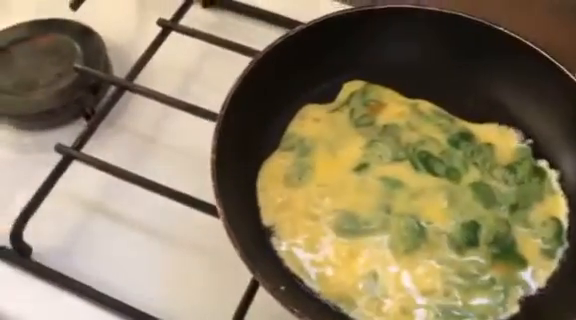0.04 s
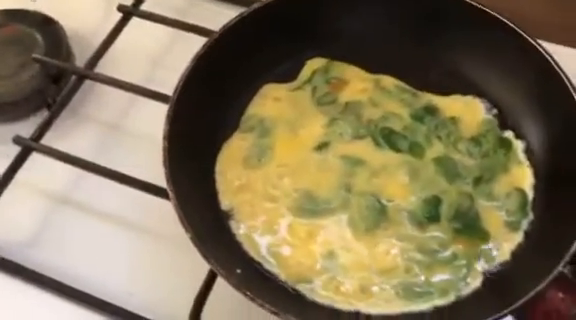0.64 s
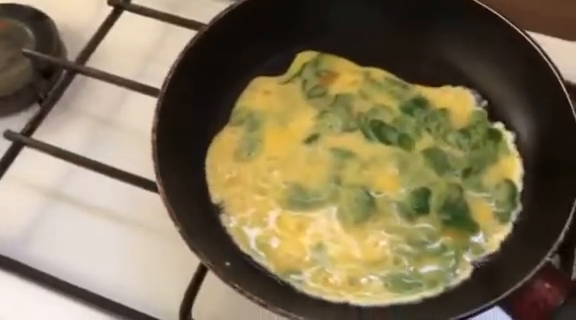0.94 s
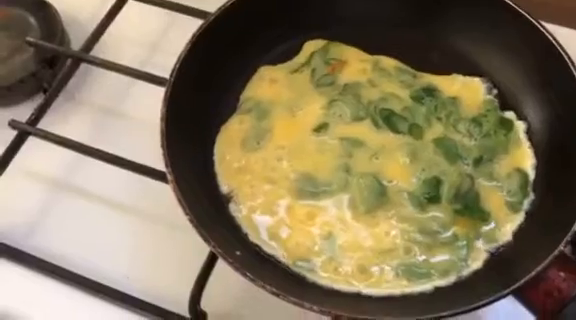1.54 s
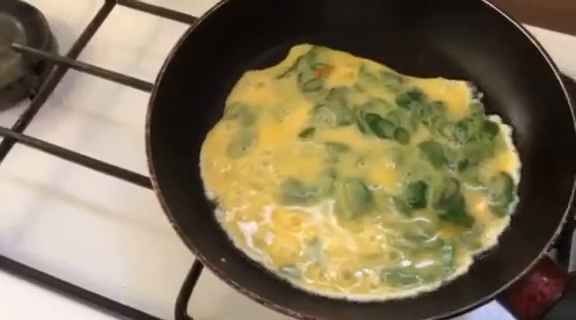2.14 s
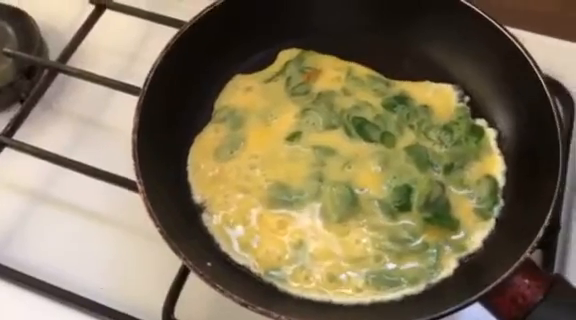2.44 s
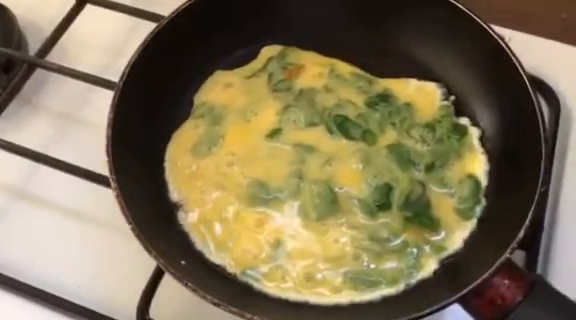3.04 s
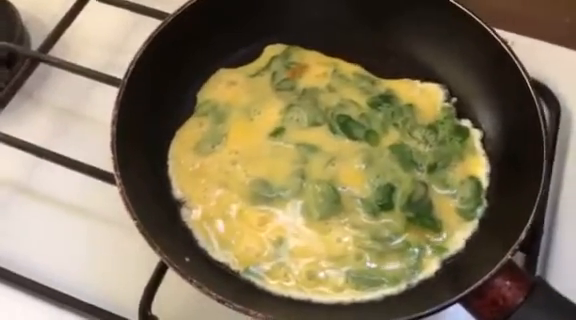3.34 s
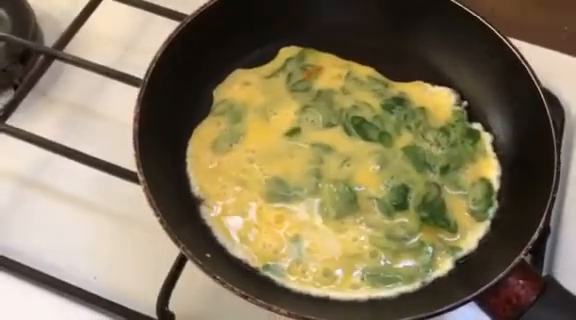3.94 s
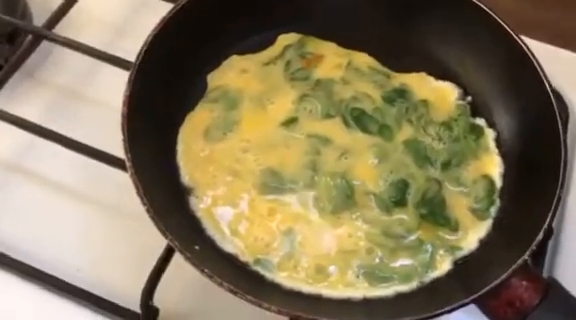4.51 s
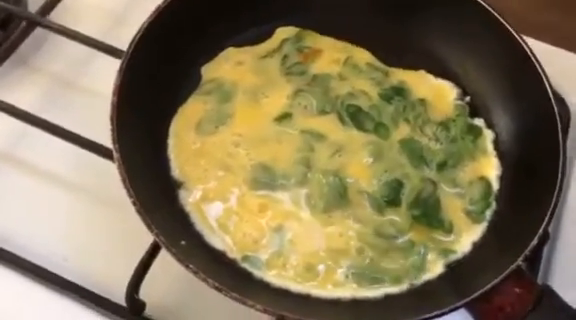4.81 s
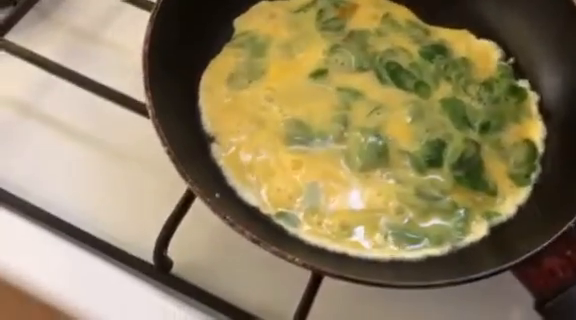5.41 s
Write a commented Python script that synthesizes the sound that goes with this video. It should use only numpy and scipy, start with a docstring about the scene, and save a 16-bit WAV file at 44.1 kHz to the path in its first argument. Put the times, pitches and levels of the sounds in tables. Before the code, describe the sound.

An omelette fries gently on a gas stove, with a faint fizz, small spits of fat and soft bubbling plops. Early on, the pan knocks on the metal grate with a quick rattle, then knocks again, ringing briefly. Later a steel utensil clinks twice and something is set down with a soft, dull thud. A low hum and the burner's rush continue underneath, heard from close by in a small kitchen.

```python
"""An omelette fries gently in a pan on a gas stove in a small kitchen: tiny bubbles fizz in the fat,
droplets spit, and steam plops through the egg in short rising notes. The pan knocks twice on the grate
and rattles, ringing the bars and booming the stove top. Later a steel utensil clinks twice and
something is set down with a dull thud. A low hum and the rush of the burner lie under it all."""
import sys
import numpy as np
from scipy import signal
from scipy.fft import rfft, irfft
from scipy.io import wavfile
from scipy.ndimage import uniform_filter1d

SR = 44100
rng = np.random.default_rng(int(sys.argv[2]) if len(sys.argv) > 2 else 0)


def transcribe(signal):
    """Save signal, clipped to [-1, 1], as a 16-bit WAV file at the path in sys.argv[1]."""
    frames = np.atleast_2d(signal).T
    limited = np.clip(frames, -1, 1)
    pcm = np.round(limited * 32767).astype(np.int16)
    wavfile.write(sys.argv[1], SR, pcm)


N = 245535
T = np.arange(SR * 3 // 4) / SR  # time after a hit, s

# Tone curves (f/Hz, gain/dB): burner, room tail, pan clack, enamel snap, stove-top boom, sizzling fat
BURNER_EQ = [(20, -24.5), (32, -11.5), (48, -3), (70, -2.5), (95, 1.5), (135, 0.5), (180, -6), (300, -11),
             (500, -15), (800, -11.5), (1050, -14.5), (1500, -22.5), (2200, -27.5), (5000, -51)]
ROOM_EQ = [(60, 3.5), (200, 6), (1200, 0.5), (3000, -3), (9000, -3)]
CLACK_EQ = [(60, -49), (140, -18.5), (300, -19.5), (500, -12.5), (770, -6.5), (950, 4.5), (1150, 0),
            (1350, 0.5), (1800, -9), (2100, -7), (2800, -23), (5000, -44), (9500, -31)]
SNAP_EQ = [(1000, -23.5), (2200, 13), (2800, -1.5), (3700, 1), (5000, -15), (9000, -14.5)]
BOOM_EQ = [(60, -23), (125, 11), (200, -4.5), (400, 3), (680, 2.5), (1000, 1), (2500, -46)]
SIZZLE_EQ = [(800, -51), (1500, -3.5), (2500, -2.5), (4000, 8), (5500, 3), (7500, 5), (8800, 3),
             (9500, -33)]
# Partials of the low hum: f/Hz, rms level/dB
HUM_PARTIALS = [(92, -59.5), (129, -71)]
# Utensil hits: t/s, level/dB, strike spot/0-1, ring time left by the grip/0-1, tock/dB, scratch/dB
UTENSIL_HITS = [(3.5331, -15, 0.06, 0.76, -3, -16), (3.7835, -6, 0.8, 0.44, -3, -24),
                (3.7864, -6, 1, 0.96, 7.5, -25), (3.7924, -10.5, 1, 0.86, 4.5, -31)]
# Pan hitting the grate: t/s, level/dB, rebound gap/s, step per rebound/dB, contact cut-off/Hz,
# bar ring/dB, strike spot/0-1, snap/dB, boom/dB
PAN_HITS = [(1.3742, 0.5, 0.0053, -7.5, 2100, -12.5, 0.15, 2, -2),
            (1.4426, -4, .00525, -10.5, 1620, -17.5, 0.2, -11, -8.5),
            (1.472, -12.5, 0.012, -2.5, 1670, -22, 0.4, -32, -12),
            (1.7314, -2.5, 0.0071, -4, 1560, -1, 0.82, 0, 1.5)]
# Modes of utensil, pan and grate bars: f/Hz, level struck at spot 0/dB, level at spot 1/dB, t60/s
UTENSIL_RING = [(490, -20, -7, .2), (734, -20, 0, .19), (1232, 7, -1, .18), (1459, -14, 2.5, .28),
                (2025, 5, -20, .22), (2073, -10, -26, 1.0), (2252, -6, -6.5, .52), (3163, -8, -12, .33),
                (3429, -14, -20, .26), (4190, 4, -2, .24), (5345, -7, -9, .22), (6595, -12, -5, .17),
                (6710, -19, -9, .17), (7520, -22, -17, .23), (7735, -22, -8, .25), (7832, -22, -7, .2),
                (7904, -22, -7, .23), (8724, -24, -14, .1)]
PAN_RING = [(687, -15, -3, .22), (860, -9, -14, .2), (948, 1.5, 4, .21), (985, -3, 0, .14),
            (1069, -9, 4, .27), (1128, 0, -10, .22), (1262, -12, -7, .27), (1329, -9, 4, .21),
            (1345, 1, -7, .2), (1403, -7, -2, .25), (1545, -14, -10, .17), (1677, -7, -13, .16),
            (1942, -13, -14, .14), (2290, -19, -19, .16), (2588, -23, -20, .22)]
BAR_RING = [(2041, -6, 1, .62), (2831, -4, -6, .16), (3470, -2, -13, .14), (3545, -2, -11, .15),
            (3941, -8, -12, .16), (4408, -10, -12, .17), (4975, -11, -7, .15), (5041, -1, 0, .24),
            (7480, -12, 0, .07), (7695, -2, -1, .13), (7765, -3, -1, .2), (8380, -20, -18, .33)]
# Vigour of the frying: t/s, level/dB
SIZZLE_ENVELOPE = [(0.0, -62.5), (0.2, -70), (1.08, -70.5), (2.24, -71.5), (3.07, -72.5), (3.28, -69.5),
                   (4.58, -73.5), (5.04, -70.5), (5.55, -72)]
# Big steam bubbles under the egg: t/s, peak level/dB, f/Hz
BIG_PLOPS = [(.411, -43.5, 630), (.545, -40.5, 783), (.628, -34, 667), (.872, -36, 900),
             (1.191, -41.5, 850), (1.26, -41.5, 730), (1.597, -43, 350), (1.896, -43, 800),
             (1.919, -40, 860), (2.015, -41.5, 800), (2.065, -42.5, 470), (2.125, -36.5, 400),
             (2.287, -45, 980), (2.622, -44.5, 780), (2.932, -42.5, 766), (3.293, -42, 720),
             (3.355, -41.5, 690), (3.377, -43.5, 880), (4.002, -41, 700), (4.702, -44, 540),
             (4.87, -46, 450), (4.97, -46, 750), (5.29, -41, 820), (5.528, -43, 630)]
# Big bursting droplets of fat: t/s, peak level/dB, centre f/Hz, spray against the tick/dB
BIG_SPITS = [(0.1444, -40.5, 4030, -13), (0.157, -40, 4030, -15), (0.188, -45, 5880, -28),
             (0.318, -47, 6030, -28), (0.327, -38.5, 3440, -22), (0.4669, -40, 6400, -14),
             (0.4850, -33, 5400, -22), (0.5403, -43, 5400, -13), (0.585, -44.5, 4500, -9),
             (0.921, -43, 3600, -18), (0.977, -45.5, 3000, -11), (1.1218, -52, 3000, -6),
             (1.207, -44.5, 4160, -14), (1.5243, -41.5, 5500, -13), (1.8814, -32, 6300, -21),
             (1.903, -46, 3500, -21), (1.9838, -47.5, 4750, -21), (2.1028, -46.5, 4710, -8),
             (2.173, -45.5, 7860, -1), (2.2361, -50, 3000, -8), (2.3518, -49.5, 3960, 0),
             (2.423, -40, 6300, -9), (2.4655, -46.5, 4770, -7), (2.6733, -48.5, 3500, -6),
             (2.702, -43.5, 5870, -20), (2.928, -51, 6000, -1), (3.1815, -31.5, 7600, -17),
             (3.2815, -40.5, 7900, -20), (3.358, -43, 7830, -8), (3.3957, -48, 2000, -2),
             (4.1007, -41.5, 4240, -15), (4.312, -49, 4000, 5), (4.6261, -45.5, 3260, -11),
             (4.688, -42, 6800, 1), (4.884, -42, 8100, -9), (4.894, -41.5, 7500, -26),
             (4.9422, -45, 3500, -16), (5.097, -43, 3500, -19), (5.39, -41, 6710, -28),
             (5.5125, -38, 7500, 11)]


def undb(db):
    """Decibels to gain."""
    return 10 ** (np.asarray(db) / 20)


def unit(x):
    """Scale to rms 1."""
    return x / np.sqrt(np.mean(x ** 2))


def add(out, s, x):
    """Mix x into out from time s."""
    i = max(int(s * SR), 0)
    out[i:i + len(x)] += x[:max(len(out) - i, 0)]


def fade(t60):
    """Exponential decay, 60 dB down after t60 seconds."""
    return np.exp(-np.log(1000) * T / t60)


def burst(t60):
    """Decaying white noise."""
    return rng.standard_normal(len(T)) * fade(t60)


def drift(rate):
    """Smooth random wobble of rms 1, with rate new values a second."""
    hold = int(SR / rate)
    steps = np.repeat(rng.standard_normal(N // hold + 1), hold)
    return unit(uniform_filter1d(uniform_filter1d(steps, hold), hold)[:N])


def eq(x, curve, size=4096):
    """Minimum-phase filter of unit energy along a tone curve (f/Hz, gain/dB)."""
    hz, db = np.transpose(curve)
    bin_hz = np.arange(size // 2 + 1) * SR / size
    gain = undb(np.interp(np.log(bin_hz + 1), np.log(hz), db))
    cepstrum = irfft(np.log(unit(gain)))
    cepstrum[1:size // 2] *= 2
    cepstrum[size // 2 + 1:] = 0
    return signal.fftconvolve(x, irfft(np.exp(rfft(cepstrum))))[:len(x)]


def soften(x, hz):
    """A softer contact lasts longer and drives less treble."""
    return signal.sosfilt(signal.butter(2, hz, fs=SR, output="sos"), x)


def ring(modes, hits, beat, contact_db, flutter_db, contact_t60=0.041):
    """Hits (t/s, level/dB, spot, ring share) feed modes that drop fast in contact, then ring on."""
    out, t = np.zeros(N), np.arange(N) / SR
    contact = undb(contact_db) * fade(contact_t60)
    attack = 1 - fade(0.003)
    for hz, db_0, db_1, t60 in modes:
        energy = np.zeros(N)
        for s, db, spot, ring_share in hits:
            gain = undb(db + np.interp(spot, [0, 1], [db_0, db_1]))
            envelope = (fade(t60 * ring_share) + contact) * attack
            add(energy, s, (gain * envelope) ** 2)
        # uneven metal splits each mode into a beating pair
        phase = hz * t + rng.random()
        split_hz = rng.uniform(15, 50) * rng.choice([-1, 1])
        pair = np.sin(2 * np.pi * phase) + beat * np.sin(2 * np.pi * (phase + split_hz * t))
        # each mode wavers quickly and randomly in level, as with room echoes
        out += np.sqrt(energy) * pair * undb(flutter_db * drift(130))
    return out


def scatter(per_s, db, hz, spread_db, spread_octaves):
    """Bubbles (t/s, level/dB, f/Hz) in random bunches, each with its own strength and size."""
    gap, strength, pitch = rng.random((200, 3)).T
    times = np.cumsum(np.log(1 - gap) ** 2 / 2) / per_s  # many short gaps, a few long ones
    levels = db + spread_db * (2 * strength - 1)
    pitches = hz * 2 ** (spread_octaves * (2 * pitch - 1))
    return np.column_stack([times, levels, pitches])[times < N / SR]


def room(x, wet_db, t60=0.37):
    """Tiles and cupboards return a short diffuse tail."""
    tail = eq(burst(t60) * (1 - fade(0.012)), ROOM_EQ)
    return x + undb(wet_db) * signal.fftconvolve(x, tail / np.linalg.norm(tail))[:N]


def hum():
    """A low hum wavers in pitch and level."""
    out = np.zeros(N)
    for hz, db in HUM_PARTIALS:
        phase = np.cumsum(hz + 3 * drift(14)) / SR
        out += undb(db) * unit(np.sin(2 * np.pi * phase) * undb(2.5 * drift(12)))
    return out


def burner(level_db=-55):
    """The gas flame lays down a soft, dark, almost steady rush."""
    return unit(eq(rng.standard_normal(N), BURNER_EQ)) * undb(level_db + 0.32 * drift(1.6))


def thud(at_s=4.391, tap_db=-36.5, hollow_db=-37, hollow_hz=360, hollow_s=0.035):
    """Something is set down: a dull tap with a hollow note that swells and is damped at once."""
    out = np.zeros(N)
    tap = eq(burst(0.087) * (1 - fade(0.012)),
             [(100, -4), (350, -4), (1100, -7.5), (1800, -17), (2600, -40), (8000, -47)])
    hollow = np.sin(2 * np.pi * hollow_hz * T) * np.sin(np.pi * np.minimum(T / hollow_s, 1))
    add(out, at_s, undb(tap_db) * tap + undb(hollow_db) * hollow)
    return room(out, wet_db=-18)


def utensil(taps_db=-37.5, steel_db=-41.5, buzz_db=-11, buzz_t60=0.08):
    """Scratchy taps ring the steel, which buzzes briefly on the surface below; that answers: tock."""
    taps, touching = np.zeros(N), np.zeros(N)
    for s, db, _, _, tock_db, scratch_db in UTENSIL_HITS:
        tock = eq(burst(0.049) * (1 - fade(0.005)),
                  [(100, -24), (450, 8), (1400, 6.5), (2400, -24), (4500, -25), (9000, -37)])
        scratch = eq(burst(0.056), [(1500, -13), (3500, 5), (5500, 7), (9000, -21)])
        add(taps, s, undb(db + tock_db) * tock + undb(scratch_db) * scratch)
        add(touching, s, fade(buzz_t60))
    hits = [hit[:4] for hit in UTENSIL_HITS]
    steel = ring(UTENSIL_RING, hits, beat=0.4, contact_db=-17, flutter_db=2.3)
    buzz = 1 + undb(buzz_db) * np.sqrt(touching) * drift(600)
    return undb(taps_db) * room(taps, wet_db=-8) + undb(steel_db) * steel * buzz


def stove(snaps_db=-38.5, booms_db=-36.5):
    """Each pan hit snaps brightly on the enamel, and the sheet-metal stove top booms just after."""
    out = np.zeros(N)
    for s, *_, snap_db, boom_db in PAN_HITS:
        snap = eq(burst(0.058), SNAP_EQ)
        boom = eq(burst(0.22) * (1 - fade(0.01)), BOOM_EQ)
        add(out, s, undb(snaps_db + snap_db) * snap + undb(booms_db + boom_db) * boom)
    return out


def rattle(count=4):
    """Each pan hit chatters on the grate in evenly spaced, ever weaker contacts."""
    return [(s + k * gap, db + k * step_db, cutoff_hz, bar_db, spot)
            for s, db, gap, step_db, cutoff_hz, bar_db, spot, _, _ in PAN_HITS for k in range(count)]


def pan(clack_db=1.5, crunch_db=-44, body_db=-35, bars_db=-47):
    """Each contact gives a sharp clack, a dense shudder, the pan's low ring and the bars' thin one."""
    clacks, contacts = np.zeros(N), rattle()
    shudder = (undb(-25) * fade(0.065) + undb(-46) * fade(0.32)) * (1 - fade(0.0048))
    for s, db, cutoff_hz, _, _ in contacts:
        impact = (T == 0) + shudder * rng.standard_normal(len(T))
        add(clacks, s, undb(db + clack_db) * soften(eq(impact, CLACK_EQ), cutoff_hz))
    # bare metal grinding on the bar adds a faint bright crunch
    for s, db, _, bar_db, _ in contacts:
        crunch = eq(burst(0.18), [(1500, -8), (2500, 12), (3800, 9.5), (6000, -7), (9000, -3)])
        add(clacks, s, undb(db + bar_db / 2 + crunch_db) * crunch)
    body_hits = [(s, db, spot, 1) for s, db, _, _, spot in contacts]
    bar_hits = [(s, db + bar_db, spot, 1) for s, db, _, bar_db, spot in contacts]
    body = ring(PAN_RING, body_hits, beat=0.25, contact_db=5, flutter_db=1)
    bars = ring(BAR_RING, bar_hits, beat=0.4, contact_db=-10, flutter_db=2.3)
    return room(clacks, wet_db=-11.5) + undb(body_db) * body + undb(bars_db) * room(bars, wet_db=-10.5)


def simmer(per_s=60, spread_db=3, level_db=-66):
    """Small bubbles mutter under the egg."""
    onsets = rng.random(N) < per_s / SR
    pops = onsets * undb(spread_db * np.minimum(rng.exponential(size=N), 3))
    muffled = [(100, -35.5), (450, 0.5), (720, 2.5), (1000, 0.5),
               (1500, -17.5), (3000, -19.5), (9000, -40.5)]
    return undb(level_db) * unit(eq(pops, muffled))


def plops(glide=0.046, decay_cycles=9, smack_db=-15):
    """Steam pockets open in the soft egg, big among small: a short rising note with a wet smack."""
    out = np.zeros(N)
    small = scatter(per_s=5.4, db=-47.5, hz=852, spread_db=0.5, spread_octaves=0.31)
    for s, db, hz in [*BIG_PLOPS, *small]:
        bend = 1 + glide * (1 - fade(0.078))
        note = np.sin(2 * np.pi * hz * T * bend) * fade(decay_cycles / hz)
        smack = eq(burst(0.024), [(hz / 3, -20), (hz * 0.48, -3), (hz, 0),
                                  (hz * 1.45, -4), (hz * 3.1, -25), (hz * 8, -45)])
        plop = (note + undb(smack_db) * smack) * (1 - fade(0.006))
        add(out, s, undb(db) * plop / np.abs(plop).max())
    return out


def spits(tick_t60=0.0021, spray_t60=0.064, small_spray_db=-4.5):
    """Fat droplets burst with a sharp tick and a fine spray; small ones crackle between the big."""
    out = np.zeros(N)
    small = scatter(per_s=14, db=-59.5, hz=3800, spread_db=4, spread_octaves=0.16)
    for s, db, hz, spray_db in BIG_SPITS + [(*row, small_spray_db) for row in small]:
        envelope = fade(tick_t60) + undb(spray_db) * fade(spray_t60)
        noise = (rng.standard_normal(len(T)) * envelope)[:SR // 10]
        spit = eq(noise, [(500, -14), (hz / 3, -7), (hz * 0.41, -4), (hz, 0), (hz * 2, -5), (20000, -40)])
        add(out, s, undb(db) * spit / np.abs(spit).max())
    return out


def sizzle(per_s=750, spread_db=3.1, flicker_db=1.4, cluster_db=1.4, hiss_db=-4.5, bands=5):
    """Countless tiny bubbles burst in the fat, in clusters and several registers, over a smooth hiss."""
    grains = np.zeros(N)
    for hz in np.geomspace(2000, 8500, bands):
        sizes = undb(spread_db * np.minimum(rng.exponential(size=N), 4)) * rng.choice([-1, 1], N)
        pops = sizes * (rng.random(N) < per_s / bands / SR)
        gain = undb(flicker_db * drift(24)) * np.sqrt(hz)
        grains += gain * eq(pops, [(hz / 3, -18), (hz, 0), (hz * 2, -14)])
    spurts = undb(flicker_db * drift(45) + cluster_db * drift(10))
    fizz = unit(grains * spurts) + undb(hiss_db) * rng.standard_normal(N)
    vigour_db = np.interp(np.arange(N) / SR, *np.transpose(SIZZLE_ENVELOPE))
    return unit(eq(fizz, SIZZLE_EQ)) * undb(vigour_db)


def scene():
    """Mono mix: frying in the kitchen's reverb, cookware accents, and a bed of burner and hum."""
    frying = room(plops() + spits(), wet_db=-10.5) + room(sizzle() + simmer(), wet_db=-5)
    return (frying + pan() + stove() + utensil() + thud() + burner() + hum())[None]


def record(dry, top_hz=9450):
    """The microphone channel cuts the top end steeply."""
    return signal.sosfilt(signal.ellip(10, 0.2, 70, top_hz, fs=SR, output="sos"), dry)


dry = scene()
out = record(dry)
transcribe(out)
```